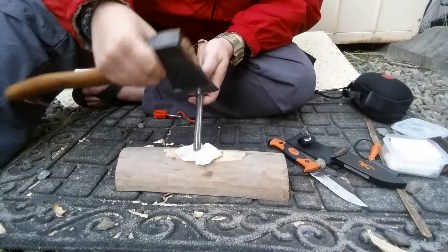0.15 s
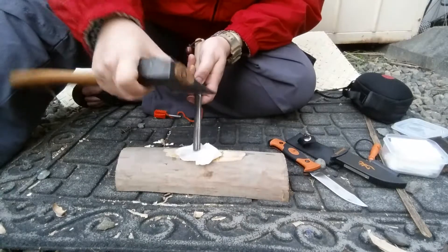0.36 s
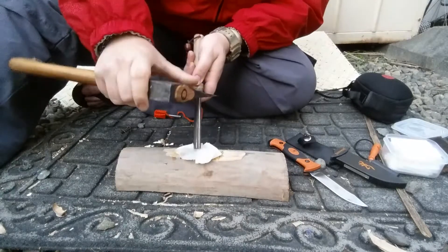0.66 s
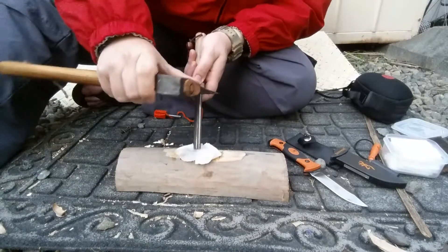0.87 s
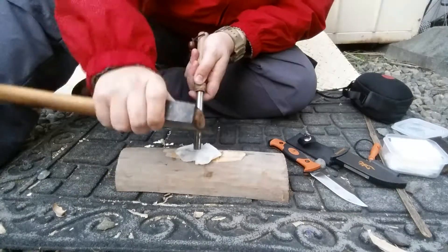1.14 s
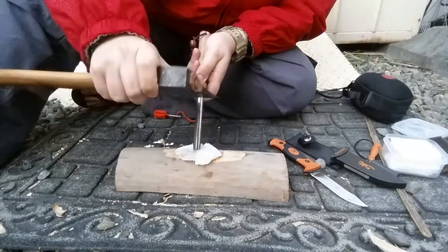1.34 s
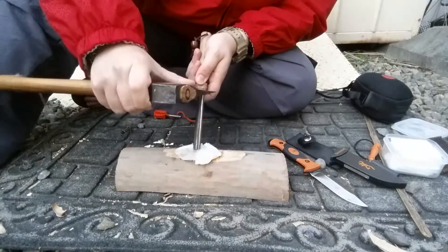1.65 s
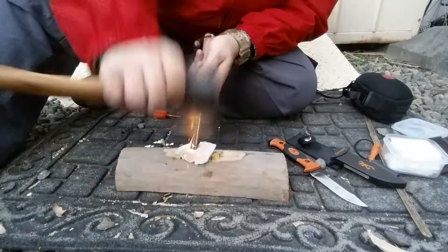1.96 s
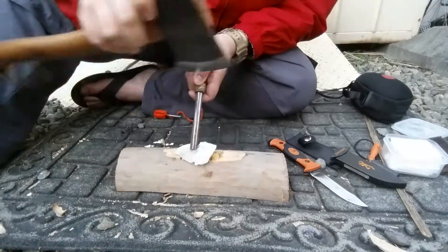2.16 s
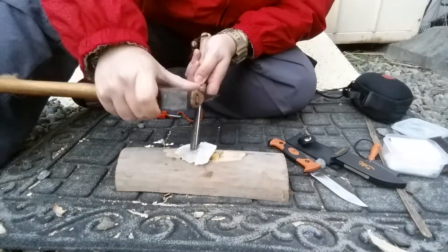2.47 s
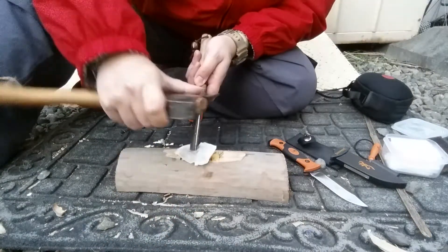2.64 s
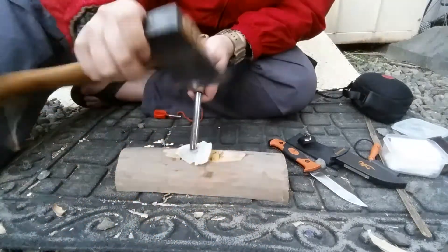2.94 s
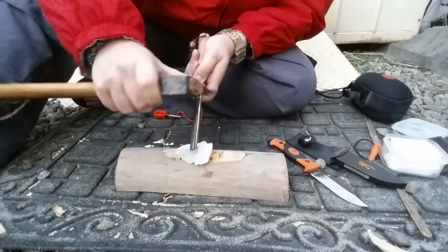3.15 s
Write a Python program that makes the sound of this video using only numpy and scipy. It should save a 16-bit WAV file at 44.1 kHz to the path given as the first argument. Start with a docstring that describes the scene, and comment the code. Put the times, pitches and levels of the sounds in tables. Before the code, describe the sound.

A spark rod standing on a log is scraped by an axe edge in three short metallic rasps, the last two spitting crackling sparks, with small clinks and log knocks between, close microphone, outdoors over distant traffic.

```python
"""Spark rod scraped with an axe

An axe edge is set against a spark rod that stands on a log, slid into place and scraped down three times, outdoors.
Grit in each stroke rings the steel modes and knocks the log; sparks are clicks and shaped noise.
Touches are clicks with decaying steel modes, log thuds are damped sines, walls nearby scatter a short tail.
Behind, distant traffic swells: rumble, road noise and hiss of the air, each shaped noise on a level curve.
"""
import sys
import numpy as np
from scipy import signal
from scipy.fft import rfft, irfft
from scipy.io import wavfile

SR = 44100
rng = np.random.default_rng(int(sys.argv[2]) if len(sys.argv) > 2 else 0)


def magnitude_from_level(level_db):
    """Linear magnitude for a level in decibels (20 dB per decade)."""
    exponent = np.asarray(level_db, float) / 20
    return 10 ** exponent


def unload_audio(sound):
    """Save the sound as a 16-bit wav file, at the path given as the first command line argument."""
    columns = np.transpose(np.atleast_2d(sound))
    # keep every value between -1 and 1, then stretch to whole-number steps
    steps = np.round(np.clip(columns, -1, 1) * 32767)
    wavfile.write(sys.argv[1], SR, steps.astype(np.int16))


N = 145530

# modes of rod and axe head: (frequency [Hz])
STEEL_MODES_HZ = [990, 1420, 1720, 2200, 2810, 3800, 4400, 5250, 6595, 7900, 9800, 10750, 11680, 13950,
                  15600]
# the same modes: (level [dB], t60 [s], left over right [dB])
STEEL_MODES = [(-6.5, 0.0095, 2.5), (-16, 0.03, -2), (-16.5, 0.017, 5), (-14, 0.02, -4), (-1.5, 0.03, -3.5),
               (-18, 0.0067, -1), (-28.5, 0.012, -19), (-28.5, 0.027, -19), (-8.5, 0.021, -6.5),
               (-10, 0.02, 7.5), (-5, 0.0059, 3), (-18, 0.024, 30.5), (-7, 0.013, -11.5), (3.5, 0.0072, 0),
               (-7, .015, 1)]
FREE_PITCH_HZ = 2800   # main ring without lift


def rms_one(x):
    """Scale to rms 1."""
    return x / np.sqrt(np.mean(x ** 2) + 1e-20)


def band(x, lo_hz, hi_hz):
    """Butterworth band-pass, second order at each edge."""
    return signal.sosfilt(signal.butter(2, [lo_hz, min(hi_hz, .45 * SR)], "band", fs=SR, output="sos"), x)


def gestures(tables):
    """Columns over time from several short curves, the level near silence between them."""
    rows = []
    for curve in tables:
        first, last = curve[0], curve[-1]
        rows += [(first[0] - .004, -130, *first[2:]), *curve, (last[0] + .05, -110, *last[2:])]
    s, *columns = np.transpose(rows)
    return [np.interp(np.arange(N) / SR, s, column) for column in columns]


def spectrum_hz():
    """Bin frequencies of the whole scene, kept above zero for log axes."""
    return np.maximum(np.arange(N // 2 + 1) * SR / N, 1)


def at_hz(points, hz):
    """Read a spectrum on a log frequency axis."""
    point_hz, value = np.transpose(points)
    return np.interp(np.log(hz), np.log(point_hz), value)


def sides(lean_db):
    """Left and right gains, lean_db apart."""
    return magnitude_from_level(np.array([[.5], [-.5]]) * lean_db)


def grains(per_s, spread_db):
    """Random clicks of uneven size and sign; rms 1."""
    hits = rng.random(N) < per_s / SR
    sizes = magnitude_from_level(spread_db * np.minimum(rng.exponential(1, N), 4))
    return rms_one(hits * sizes * rng.choice([-1, 1], N))


def coloured(x, spectrum):
    """Shape noise by a spectrum; rms 1."""
    return rms_one(irfft(rfft(x) * magnitude_from_level(at_hz(spectrum, spectrum_hz())), N))


def add(out, s, sound):
    """Mix a short sound in at time s."""
    i = int(s * SR)
    out[..., i:i + sound.shape[-1]] += sound[..., :N - i]


def lifted(hz, lift_hz):
    """A firm hold lifts the upper rings alike, the lowest ones less."""
    return hz + lift_hz * min(hz / FREE_PITCH_HZ, 1) ** 2


def ring(push, hz, t60_s):
    """Two pushes through one mode with steep skirts, as quadratures carried up to a pitch that may move."""
    r = magnitude_from_level(-60 / (t60_s * SR))
    skirt = r ** 8   # steeper fall beyond 8 ring widths
    slow = signal.lfilter([np.sqrt(1 - r * r)], [1, -r], push + 1e-18)
    slow = signal.lfilter([1 - skirt], [1, -skirt], slow)
    phase = 2 * np.pi * np.cumsum(hz * np.ones(push.shape[-1])) / SR + np.pi / 4
    return (slow * np.sin(phase + np.array([[0], [np.pi / 2]]))).sum(axis=0)


def rubbing():
    """Dense grit under the moving edge rings the steel modes and knocks the log below."""
    # edge along the rod: (time [s], main ring [dB], then over it: high rings [dB], top rings [dB],
    # low rings and log [dB])
    rubs = [
        [(0.0, -85, 2, -12, -9), (0.024, -80, -5, -16, -6), (0.044, -73, -1, -22, -9),
         (0.058, -68.5, -9, -21, 6), (0.068, -80, 4, -23, -2), (0.086, -102, -6, -13, 26)],
        [(0.781, -96, -14, -17, 3), (0.783, -65, -19, -20, 3.1), (0.796, -72.5, -14, -8, 6),
         (0.803, -88, -8, -8, 6)],
        [(1.1, -96, -24, -9, 3), (1.116, -63.5, -13, -12, 10), (1.146, -46.5, -4.5, -14, -10.5),
         (1.186, -49.5, 5, -3.5, 7), (1.2, -54.5, 8.5, -2, -1), (1.212, -56.5, 18, 5, 15.5),
         (1.235, -81, -36, -16, -10)],
        [(1.61, -84, -15, -10, 7), (1.638, -61, -10, -21, -19), (1.66, -78, -22, -23, 7),
         (1.672, -62.5, -11, -20, -20), (1.69, -66.5, -14, -8, 0), (1.714, -68.5, -3, -10, 11),
         (1.73, -98, -12, 4, -7)],
        [(1.875, -81, -23, -10, 3.7), (1.889, -58.5, -22, -16, 10.7), (1.907, -46.5, -4, -10.5, 0.59),
         (1.937, -43, -1, -5.5, 1.6), (1.947, -52.5, 16.5, -5, 21), (1.957, -54, 12, 19, 5.3),
         (1.97, -58.5, 10.5, 19, 8)],
        [(2.49, -82.5, -16, -11, 22.5), (2.518, -70.5, -11, -20, 3.1), (2.56, -68.5, -6, -11, 8.1),
         (2.59, -112, -12, -13, 13), (2.608, -59, -9, -15, 2.7), (2.624, -65, -12, -15, 15),
         (2.64, -101, -17, -18, 9)],
        [(2.716, -72, -11, -13, 6), (2.731, -42.5, -13, -19.5, 2), (2.757, -41, 7, -9.5, -8),
         (2.766, -53.5, 16.5, 3, 9), (2.779, -45.5, 4, 4, 8), (2.789, -49, 12, 17, -2),
         (2.8, -54.5, 15.5, 18, 11.5)],
        [(3.185, -78, -24, -25, -1), (3.193, -78, -20, 0, -5), (3.215, -52, -15, -30, -7),
         (3.233, -90, 6, -5, 9), (3.25, -81, -12, 7, 17)],
    ]
    # hold during each rub: (lift of the rings [Hz], upper of the two high rings over the lower [dB])
    holds = [(12, -7), (-86, -6), (-3, -5.5), (22, -7), (-0.5, -6), (29, 1), (6, 3), (209, 9)]
    high_ring_hz, top_ring_hz, top_ring_most_db = 6000, 9000, 3
    wander_db, wander_s = 3, .012   # each ring swells and fades as the edge moves
    slide_hz = (860, 1070)   # lowest ring climbs as the edge nears the foot of the rod
    slide_at, slide_span = .6, .12   # middle and width of the climb, shares of the rub
    log_db = -5

    level_db, high_db, top_db, knock_db = gestures(rubs)
    out, grit = np.zeros((2, N)), grains(6000, 2.5)   # per s, dB
    for rub, (lift_hz, upper_db) in zip(rubs, holds):
        start_s, end_s = rub[0][0], rub[-1][0]
        part = slice(max(int(start_s * SR) - 300, 0), int(end_s * SR) + 3000)
        size = len(grit[part])
        t = np.arange(size) / SR
        climb = np.tanh((t / (end_s - start_s) - slide_at) / slide_span)
        for hz, (mode_db, t60_s, lean_db) in zip(STEEL_MODES_HZ, STEEL_MODES):
            if hz > top_ring_hz:
                over_db = np.minimum(top_db[part], top_ring_most_db)
            elif hz > high_ring_hz:
                over_db = high_db[part] + upper_db * np.sign(hz - 7000) / 2
            else:
                over_db = knock_db[part] * (hz < FREE_PITCH_HZ)
            swell_db = wander_db * np.interp(t / wander_s, np.arange(64), rng.standard_normal(64))
            push = grit[part] * rng.uniform(-1.62, 1.55, (2, size))
            push = push * magnitude_from_level(level_db[part] + mode_db + over_db + swell_db)
            lowest = hz == STEEL_MODES_HZ[0]
            pitch_hz = np.interp(climb, [-1, 1], slide_hz) if lowest else lifted(hz, lift_hz)
            out[:, part] += sides(lean_db) * ring(push, pitch_hz, t60_s)
    return out + magnitude_from_level(level_db + knock_db + log_db) * rms_one(band(grit, 450, 1200))


def sparks():
    """Burning sparks: bright crackle and hiss, with single noise bursts."""
    # (time [s], level [dB], dullness: level below the treble [dB])
    showers = [
        [(1.14, -88.5, -39), (1.168, -61, 2), (1.212, -81.5, 34.5), (1.226, -62, -3.5), (1.32, -80, 6)],
        [(1.935, -44.5, 2), (1.953, -35.5, -1.5), (1.967, -34, -9), (1.981, -46.5, -6), (1.999, -39, -6.5),
         (2.015, -39.5, -6), (2.035, -61, -5.5), (2.1, -77, 6)],
        [(2.775, -50.5, 8.5), (2.791, -28.5, -20.5), (2.809, -42.5, -11), (2.817, -33.5, -6),
         (2.861, -64.5, -1), (2.93, -71, -1.5)],
    ]
    # treble of the sparks: (frequency [Hz], relative density [dB])
    colour = [(4120, -77), (7000, -15), (8380, -5), (11500, 5.5), (12600, 0.5), (14500, 6.5), (16000, -5)]
    # big sparks burst: (time [s], level [dB])
    pops = [(1.9894, -23), (2.003, -16), (2.012, -16.5), (2.111, -47), (2.7885, -15), (2.8264, -21),
            (2.996, -49)]
    hiss_share, pop_t60_s = 0.73, .006

    level_db, dull_db = gestures(showers)
    fizz = grains(8900, 4) + hiss_share * rng.standard_normal((2, N))   # per s, dB
    dull = magnitude_from_level(dull_db - 3.5) * rms_one(band(fizz, 890, 6840))
    out = magnitude_from_level(level_db) * (coloured(fizz, colour) + dull)
    t = np.arange(SR // 50) / SR
    for s, db in pops:
        burst = rng.standard_normal(len(t)) * magnitude_from_level(db - 9 - 60 * t / pop_t60_s)
        add(out, s, band(burst, 5000, 16000))
    return out


def taps():
    """The axe touches the rod: a short click and the steel modes dying away."""
    # (time [s], level [dB], main ring setting [Hz], brightness [dB per octave], click [dB], low rings [dB])
    touches = [(0.057, -49.5, 2813, -21, 4, 5), (.1158, -44.5, 2724, -11, -1, 11),
               (1.2057, -36.5, 2720, 1.5, -14, 21), (1.4969, -34.5, 2900, -11, -3, 12.5),
               (1.537, -56, 2930, -20, -20, 3), (1.711, -51, 2910, -18, 19.5, 20),
               (2.4606, -54, 2730, -4, 22.5, 15), (2.6198, -48.5, 3140, -16, 10, 9),
               (3.1704, -20.5, 3012, -7, 4.5, 2), (3.21, -58, 3000, -16, -20, -6),
               (3.28, -46.5, 2760, -4.5, 0, 8)]
    click_t60_s, click_lo_hz, click_hi_hz = 0.0042, 515, 4300
    damping = .85   # share of the free decay time
    rise_s, firm_db, slowing = .0003, -20, .25   # rise of a firm touch; dB of rise time per dB softer

    out, t = np.zeros((2, N)), np.arange(SR // 8) / SR
    for s, db, ring_hz, bright_db, click_db, low_db in touches:
        click = rng.standard_normal(len(t)) * magnitude_from_level(click_db + 5.0 - 60 * t / click_t60_s)
        click = band(click, click_lo_hz, click_hi_hz)
        sound = band(click, click_lo_hz / 2, click_hi_hz) * np.ones((2, 1))
        for hz, (mode_db, t60_s, lean_db) in zip(STEEL_MODES_HZ, STEEL_MODES):
            tilt_db = bright_db * np.log2(hz / FREE_PITCH_HZ) if hz >= FREE_PITCH_HZ else low_db
            height_db = mode_db - 4 + rng.normal(0, 1) + tilt_db
            decay = magnitude_from_level(height_db - 60 * t / (damping * t60_s))
            pitch_hz = lifted(hz, ring_hz - FREE_PITCH_HZ)
            sound += sides(lean_db) * decay * np.sin(2 * np.pi * pitch_hz * t)
        rise = (1 - np.exp(-t / (rise_s * magnitude_from_level(slowing * (firm_db - db))))) ** 2
        add(out, s, magnitude_from_level(db) * rise * sound)
    return out


def thuds():
    """Blows to the log: damped swings, starting with a push away."""
    # (time [s], level [dB], frequency [Hz], t60 [s])
    blows = [(.0565, -59, 670, 0.024), (1.182, -32.5, 206, 0.061), (1.1947, -25.5, 199, 0.094),
             (1.498, -34, 300, 0.019), (1.71, -36.5, 133, 0.059), (1.9443, -26, 995, 0.02),
             (1.946, -32, 457, 0.072), (1.952, -16.5, 247, 0.016), (1.9815, -9, 349, 0.013),
             (1.9835, -31, 452, 0.045), (1.983, -36.5, 1744, 0.02), (1.981, -38, 3680, 0.016),
             (1.985, -21, 138, 0.045), (2.778, -29.5, 980, 0.02), (2.779, -39, 1750, 0.022),
             (2.796, -34, 205, 0.082), (3.1697, -12.5, 960, 0.0025), (3.17, -28.5, 450, 0.014),
             (3.178, -28.5, 204, 0.056)]
    rise_cycles = .42
    out, t = np.zeros(N), np.arange(SR // 6) / SR
    for s, db, hz, t60_s in blows:
        rise = 1 - np.exp(-t * hz / rise_cycles)
        add(out, s, -rise * magnitude_from_level(db + 3.5 - 60 * t / t60_s) * np.sin(2 * np.pi * hz * t))
    return band(out, 60, 14000)


def yard(x):
    """Walls nearby scatter the sound: a thin, dull noise tail that dies fast."""
    level_db, top_hz, t60_s, rise_s = -13, 4670, .13, 0.00063
    t = np.arange(SR // 4) / SR
    tail = band(rng.standard_normal((2, len(t))), 400, top_hz)
    tail = tail * magnitude_from_level(-60 * t / t60_s) * np.minimum(t / rise_s, 1)
    return signal.fftconvolve(x[None], magnitude_from_level(level_db) * rms_one(tail) / np.sqrt(len(t)))[:, :N]


def wide_noise():
    """White noise whose two sides agree in the bass and part in the treble."""
    # (frequency [Hz], left-right likeness, clipped to 0..1)
    likeness = [(60, 1), (150, 0.92), (380, 0.71), (950, -0.84), (2380, -2.3), (5980, -1.8), (15000, -0.75)]
    # (frequency [Hz], left over right [dB])
    lean = [(60, -1), (180, -2.5), (550, -0.5), (1650, -1), (4970, -4), (15000, 1.5)]
    hz = spectrum_hz()
    alike = np.clip(at_hz(likeness, hz), 0, 1)
    mid, side = rfft(rng.standard_normal((2, N)))
    both = np.sqrt(1 + alike) * mid + np.sqrt(1 - alike) * side * [[1], [-1]]
    return irfft(both * sides(at_hz(lean, hz)), N)


def traffic():
    """Far traffic: rumble, road noise and a thin hiss, each on its level curve."""
    # (time [s], rumble [dB], road noise [dB], hiss of the air [dB])
    swells = [(0.0, -54, -69.5, -86), (0.27, -54, -69.5, -86.5), (0.39, -51.5, -70.5, -79),
              (0.49, -56.5, -71, -79.5), (0.57, -57, -74.5, -86.5), (0.66, -55, -74.5, -84),
              (0.71, -53, -73, -81), (0.88, -52, -68, -77), (1.17, -51, -73.5, -85.5),
              (1.3, -49.5, -64, -69), (1.44, -52, -68, -80.5), (1.72, -48.5, -63, -81),
              (1.95, -50.5, -69.5, -84), (2.06, -49, -57, -59.5), (2.24, -49.5, -65.5, -75),
              (2.51, -47, -64, -81), (2.74, -44, -62.5, -82.5), (2.89, -45, -60, -65),
              (3.3, -46.5, -60.5, -81)]
    # spectra: (frequency [Hz], relative density [dB])
    rumble = [(13, -56), (22, -18), (43, -5.5), (69, -10.5), (114, 0.5), (146, -5.5), (179, -7),
              (222, -10.5), (278, -12), (450, -21.5), (580, -44), (990, -120)]
    road = [(240, -16.5), (400, -13.5), (443, -3.5), (817, -6.5), (1490, -18), (2190, -23.5), (2420, -22.5),
            (6000, -43), (7800, -48), (13200, -120)]
    air = [(3240, -7), (5500, -10.5), (8220, -15), (8710, -9.5), (9960, -4.5), (13700, -1), (15000, 2.5),
           (16000, -7)]
    s, *levels_db = np.transpose(swells)
    out = np.zeros((2, N))
    for level_db, colour in zip(levels_db, (rumble, road, air)):
        out += magnitude_from_level(np.interp(np.arange(N) / SR, s, level_db)) * coloured(wide_noise(), colour)
    return out


def scene():
    """Work at the log, its two channels out of step, in a yard, over traffic."""
    # (frequency [Hz], phase by which left leads [rad])
    left_lead = [(0, 0), (2150, 0.13), (2670, 0.31), (3100, 1), (4910, 0.99), (5860, -0.89), (10200, -1.1),
                 (13800, 1.0), (16000, 0.49)]
    near = (rubbing() + sparks() + taps() + thuds()) * sides(-1.5)
    turn = at_hz(left_lead, spectrum_hz()) * [[.5j], [-.5j]]
    return irfft(rfft(near) * np.exp(turn), N) + yard(near.mean(axis=0)) + traffic()


def band_limit(x):
    """A steep low-pass at the top of the band."""
    return signal.sosfilt(signal.butter(12, 15950, fs=SR, output="sos"), x)


def record(dry):
    """Finish the mix."""
    return band_limit(dry)


dry = scene()
out = record(dry)
unload_audio(out)
```